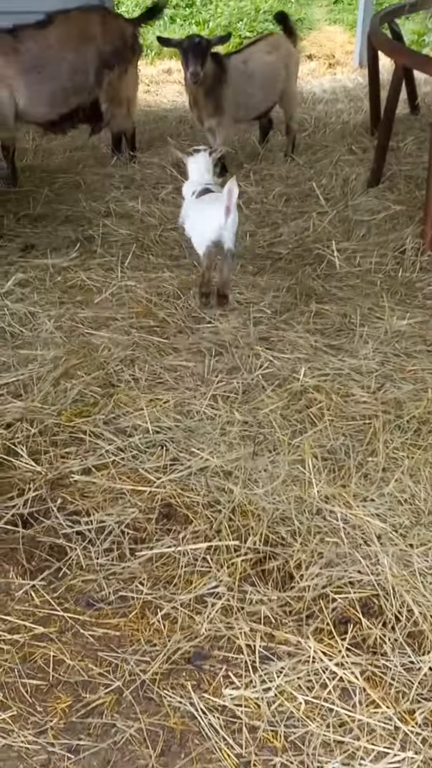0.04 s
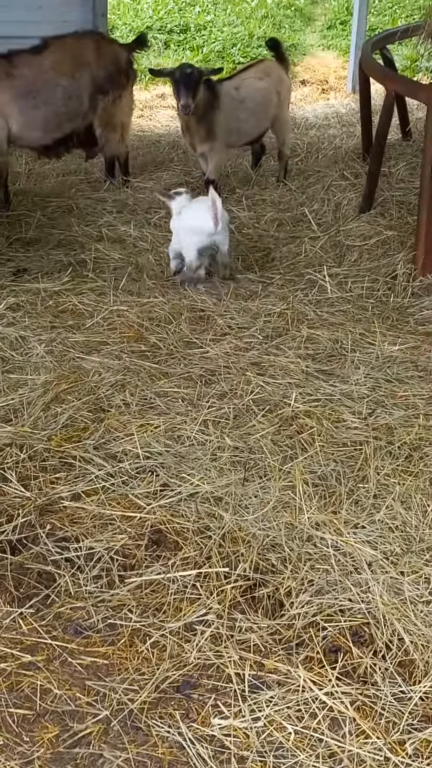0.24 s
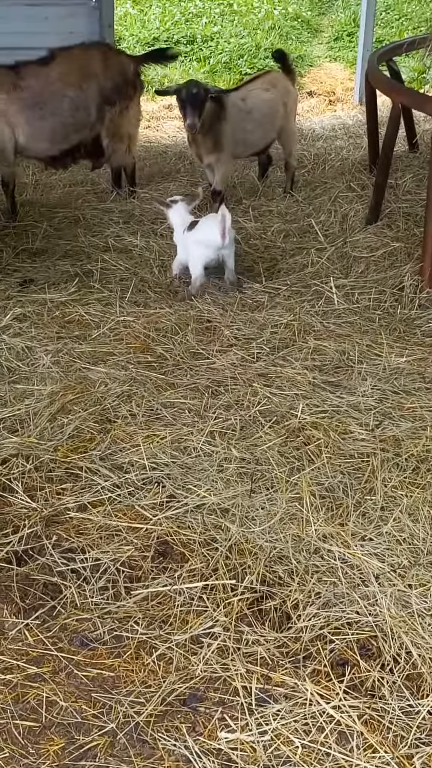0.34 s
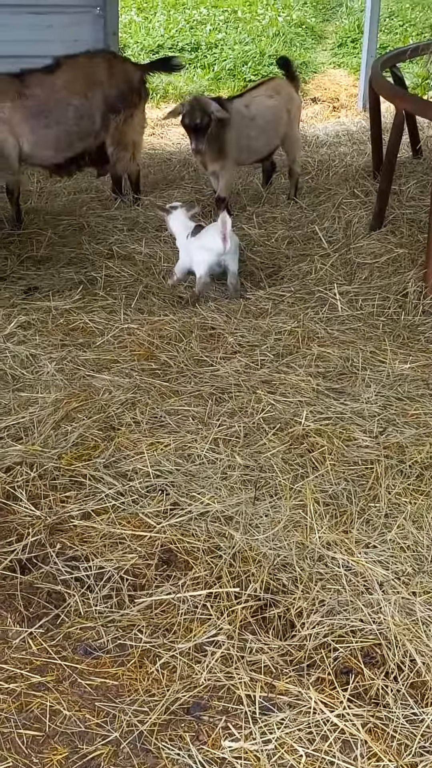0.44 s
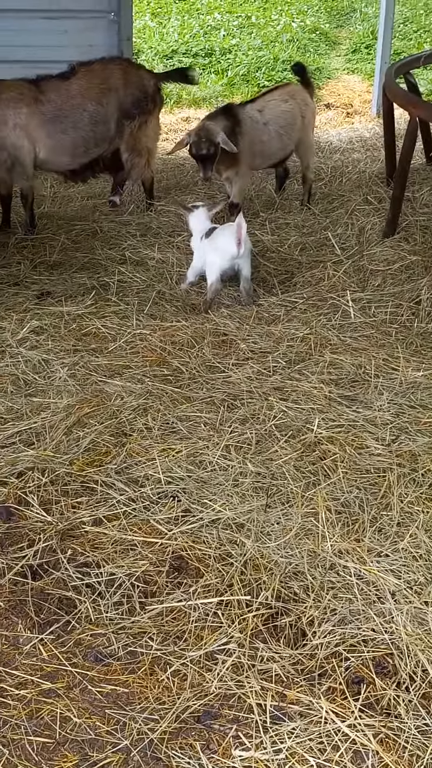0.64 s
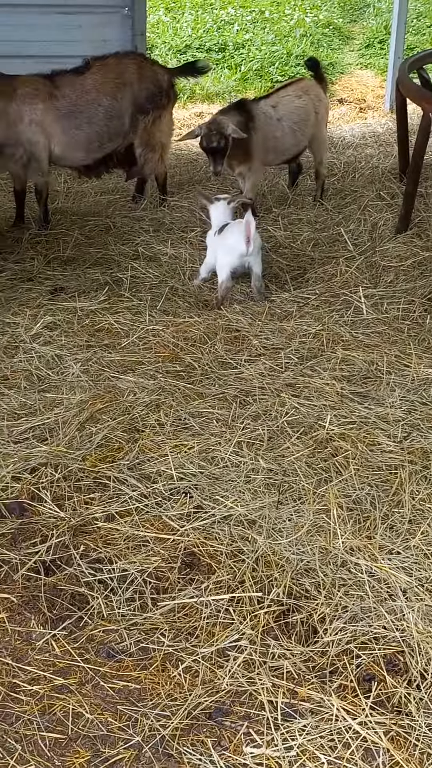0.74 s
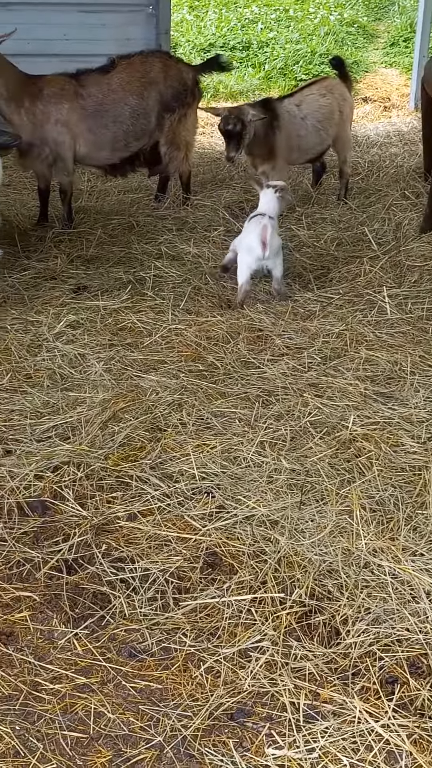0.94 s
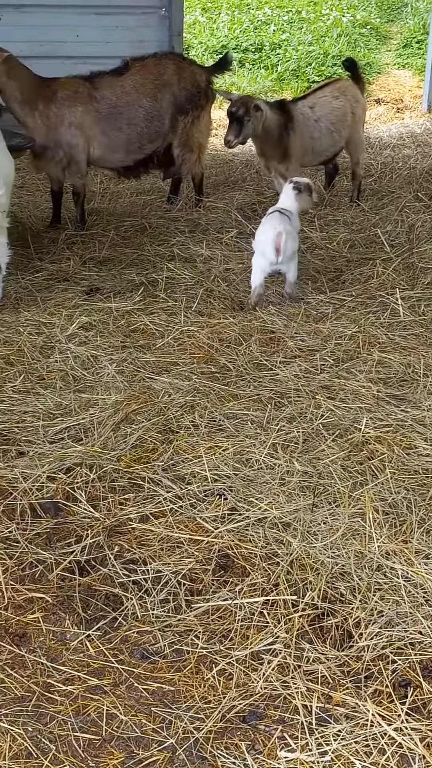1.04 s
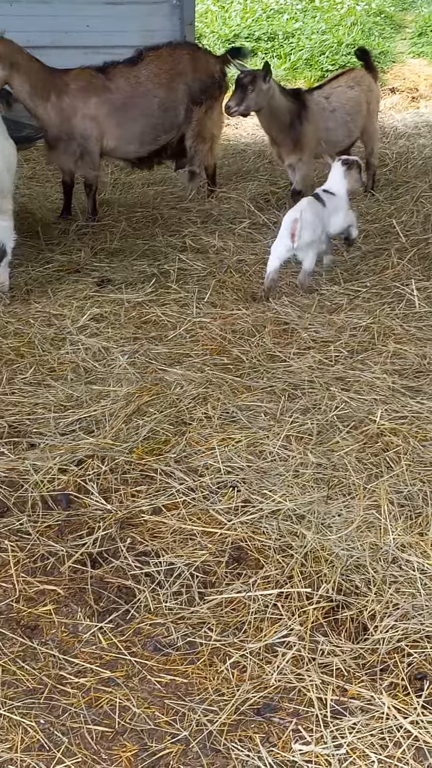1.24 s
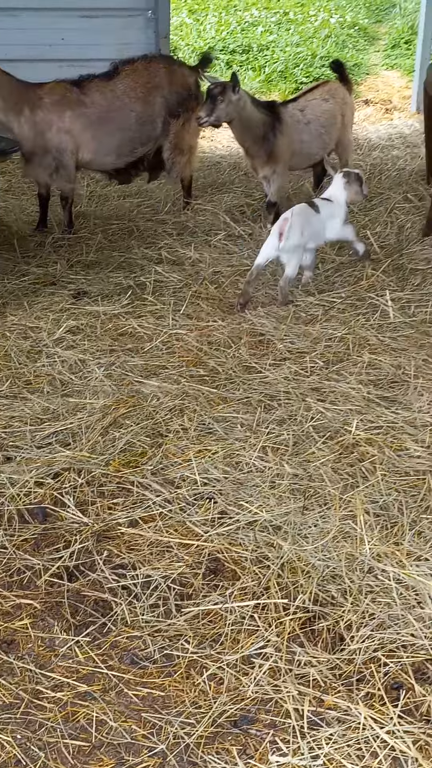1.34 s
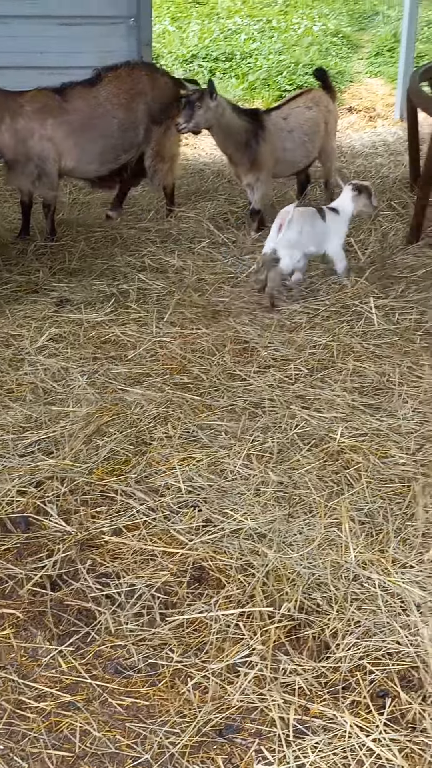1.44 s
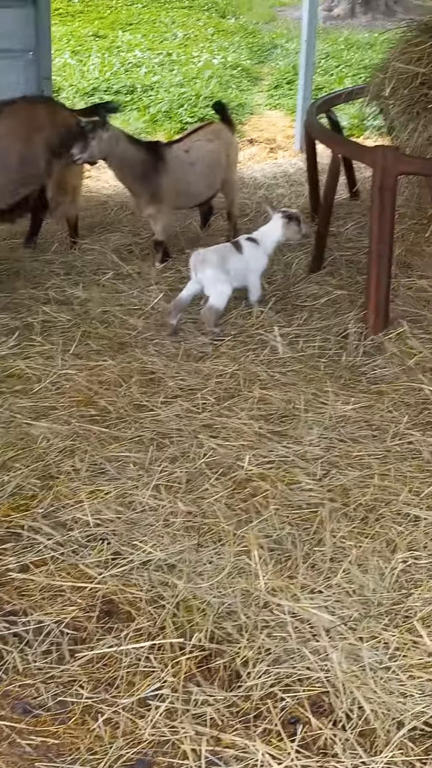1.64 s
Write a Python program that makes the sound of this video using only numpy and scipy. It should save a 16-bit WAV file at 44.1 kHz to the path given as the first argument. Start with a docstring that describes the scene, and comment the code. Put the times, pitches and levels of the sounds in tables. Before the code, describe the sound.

In an open-sided straw pen, goat hooves patter with dull wooden knocks while dry stalks crackle; the steps peak midway, lighten into a dragging scuff and stop, over faint air and low wind rumble.

```python
"""Goats shuffle about a straw-covered pen under an open shed roof.
Throughout lie a faint outdoor hiss, band-filtered noise, and a lumpy low noise rumble, probably wind.
After a straw flick come two quick clusters of hoof thumps: decaying modes of something hollow and wooden.
A longer run follows under the loudest straw rustle, made of flickering noise and ringing crackles.
Lighter thumps and a strong scuff, noise through the same modes, come late; then the hooves stop."""
import sys
import numpy as np
from scipy import signal
from scipy.fft import rfft, irfft, next_fast_len
from scipy.io import wavfile

SR = 44100
rng = np.random.default_rng(int(sys.argv[2]) if len(sys.argv) > 2 else 0)


def pcm_store(signal):
    """Save signal as 16-bit PCM."""
    levels = np.round(np.clip(np.atleast_2d(signal), -1, 1) * 32767)
    wavfile.write(sys.argv[1], SR, levels.astype(np.int16).T)


N = 72765

# Mode levels are relative: each layer adds its own gain.
# Low modes of the hollow wooden body: frequency_hz [Hz], level_db [dB], t60_s [s]
BODY_MODES = [(91.4, -3.5, 0.52), (146, -12.5, 0.37), (178, 1, 0.23), (215, -2.5, 0.23), (231, -4.5, 0.22),
              (262.7, 2, 0.12), (293.6, 2.5, 0.16), (320, -1, 0.12), (364, -1, 0.2)]
# Higher hollow overtones of the body: frequency_hz [Hz], level_db [dB], t60_s [s]
OVERTONE_MODES = [(460, -1.5, 0.056), (561, -3, 0.098), (622, -4, 0.057), (718, -13, 0.096)]
# Brighter knock of the hoof edge: frequency_hz [Hz], level_db [dB], t60_s [s]
KNOCK_MODES = [(865.6, -7, 0.14), (1043, -0.5, 0.015), (1141, -2, 0.029), (1373, -10, 0.028),
               (1467, -3.5, 0.016), (1780, -19, 0.013), (2326, 1.5, 0.04), (2950, -25, 0.02)]
# Spectral density of straw noise: frequency_hz [Hz], relative density_db [dB per Hz]
STRAW_SPECTRUM = [(240, -24), (400, -4.5), (754, -6), (846, 1.5), (985, -5), (1300, -4), (1520, -7.5),
                  (2680, -8.5), (3640, -15.5), (5530, -17), (7040, -22.5), (8300, -43), (10800, -73),
                  (18300, -120)]

RIGHT_LAG_S = 0.0001  # later arrival on the right


def from_db(db):
    """A level difference in decibels is a logarithmic amplitude ratio."""
    return 10 ** (np.asarray(db) / 20)


def rms_one(x):
    """Dividing by the root mean square sets the mean power to 1."""
    return x / np.sqrt(np.mean(x ** 2) + 1e-20)


def level_in_time(points):
    """An envelope is interpolated linearly in decibels between its time points."""
    time_s, level_db = np.transpose(points)
    return np.interp(np.arange(N) / SR, time_s, level_db)


def at_hz(points, hz):
    """A spectrum is interpolated over the logarithm of frequency."""
    frequency_hz, value = np.transpose(points)
    return np.interp(np.log(hz), np.log(frequency_hz), value)


def band(x, low_hz, high_hz):
    """A band-pass filter keeps the energy between two corner frequencies."""
    corners_hz = [low_hz, min(high_hz, 0.45 * SR)]
    return signal.sosfilt(signal.butter(2, corners_hz, "band", fs=SR, output="sos"), x)


def drift(corner_hz):
    """Noise through two equal low-pass poles is a slow random fluctuation; rms 1."""
    step = 40  # samples between the computed points
    pole = np.exp(-2 * np.pi * step * corner_hz / SR)
    noise = rng.standard_normal(N // step + 2002)
    slow = signal.lfilter([1], [1, -2 * pole, pole * pole], noise)[2000:]  # settled part
    return np.interp(np.arange(N) / step, np.arange(len(slow)), rms_one(slow))


def ring(x, hz, t60_s):
    """A two-pole resonator answers a unit impulse with a decaying sine of height 1."""
    radius = from_db(-60 / (t60_s * SR))
    angle = 2 * np.pi * hz / SR
    return signal.lfilter([0, np.sin(angle)], [1, -2 * radius * np.cos(angle), radius ** 2], x + 1e-18)


def stereo(mid, side, correlation):
    """The power shares of sum and difference signals set the correlation between the sides."""
    correlation = np.clip(correlation, -1, 1)
    return np.sqrt(1 + correlation) * mid + np.sqrt(1 - correlation) * side * [[1], [-1]]


def coloured(spectrum, patchy_db, snap_share):
    """Weighted third-octave bands of noise and tiny snaps shape a spectrum, with slow modulation; rms 1."""
    # Left-right correlation, clipped to -1..1: frequency_hz [Hz], correlation [no unit]
    side_likeness = [(60, 0.42), (150, -1.5), (380, 0.43), (950, -0.059), (2380, 0.15), (5980, -0.24),
                     (15000, 0.092)]
    snaps_per_s = 3000
    edges_hz = 90 * 2 ** np.arange(0, 7.7, 1 / 3)
    common = drift(14)

    snap_size = from_db(4.7 * np.minimum(rng.exponential(1, (2, N)), 3))
    snaps = (rng.random((2, N)) < snaps_per_s / SR) * snap_size
    share = np.clip(snap_share, 0, 1)
    power = 1 - share + share * rms_one(snaps)[:, None] ** 2
    grains = rng.standard_normal((2, 2, N)) * np.sqrt(power)

    out = 0
    for k, (low_hz, high_hz) in enumerate(zip(edges_hz, edges_hz[1:])):
        hz = np.sqrt(low_hz * high_hz)
        own = drift(21)
        if spectrum[0][0] <= hz <= spectrum[-1][0] * 1.1:
            gain = from_db(at_hz(spectrum, hz) + patchy_db * (1.14 * common + own))
            mid, side = band(grains[k % 2], low_hz, high_hz)  # neighbours use separate noise
            out = out + gain * stereo(mid, side, at_hz(side_likeness, hz))
    return rms_one(out)


def outdoor_air():
    """Broadband noise with a shaped spectrum gives a faint, unsteady hiss."""
    # Spectral density of the hiss: frequency_hz [Hz], relative density_db [dB per Hz]
    air_spectrum = [(59, -30), (100, 5), (583, 4.5), (1170, -13), (1830, -8), (3250, -14.5), (6560, -12.5),
                    (8110, -61), (14700, -27), (16000, -33)]
    return from_db(-46) * coloured(air_spectrum, patchy_db=-3.0, snap_share=0)


def rumble():
    """Narrow-band low noise, weakly correlated between sides, swells in lumps."""
    # Rumble envelope: time_s [s], level_db [dB]
    envelope = [(0.0, -30.5), (0.064, -35.5), (0.086, -30.5), (0.188, -41.5), (0.238, -24), (0.27, -19),
                (0.306, -23.5), (0.372, -31), (0.404, -29), (0.482, -44), (0.518, -33.5), (0.55, -55),
                (0.568, -37), (0.666, -41), (0.694, -32), (0.712, -26), (0.798, -42), (1.02, -52),
                (1.042, -44), (1.08, -43), (1.158, -55), (1.24, -35), (1.272, -49), (1.304, -30),
                (1.354, -43), (1.57, -86), (1.626, -65), (1.65, -63)]
    mid, side = band(rng.standard_normal((2, N)), 58.3, 102)
    return from_db(level_in_time(envelope)) * rms_one(stereo(mid, side, 0.31))


def crackle():
    """Breaking stalks are random impulses exciting short resonances, each with its own pitch and place."""
    crackles_per_s, ring_cycles = 350, 26  # mean rate; cycles in one t60
    born = rng.random(N) < crackles_per_s * from_db(4 * drift(15)) / SR
    strength = from_db(3.1 * np.minimum(rng.exponential(1, N), 3))
    place = rng.choice([-1, 1], (2, N)) * rng.uniform(0.36, 1, (2, N))
    clicks = born * strength * place

    pitches_hz = np.geomspace(750, 6000, 16)
    pitch_index = rng.integers(0, 16, N)
    out = 0
    for k, hz in enumerate(pitches_hz):
        gain = from_db(at_hz(STRAW_SPECTRUM, hz) + 10 * np.log10(hz))  # wider bands at higher pitch
        out = out + gain * ring(clicks * (pitch_index == k), hz, ring_cycles / hz)
    return rms_one(out)


def straw():
    """Friction noise in a main and a treble spectrum joins random crackles and brief band-noise flicks."""
    # Rustle envelope, before the gains of its layers: time_s [s], level_db [dB]
    rustle_levels = [(0.0, -51), (0.1, -63), (0.118, -48), (0.146, -54.5), (0.178, -48), (0.224, -51),
                     (0.234, -42), (0.238, -43.5), (0.28, -47), (0.362, -50), (0.39, -34.5), (0.418, -34),
                     (0.444, -40.5), (0.546, -35.5), (0.596, -39), (0.628, -33), (0.67, -28),
                     (0.684, -23.5), (0.836, -33), (0.9, -36.5), (0.918, -41), (0.95, -35), (0.988, -42),
                     (1.0, -35), (1.024, -43), (1.038, -37.5), (1.06, -42.5), (1.112, -39.5), (1.176, -49),
                     (1.216, -43.5), (1.262, -56), (1.414, -44), (1.446, -51), (1.492, -45), (1.63, -58.5),
                     (1.65, -52.5)]
    # Treble envelope, before the treble gain: time_s [s], level_db [dB]
    treble_levels = [(0.0, -54), (0.142, -60.5), (0.202, -52.5), (0.224, -56), (0.238, -43.5), (0.266, -59),
                     (0.398, -47.5), (0.444, -55), (0.582, -55), (0.642, -44.5), (0.67, -49.5),
                     (0.706, -37.5), (0.812, -59.5), (0.876, -54.5), (0.988, -59.5), (1.144, -54),
                     (1.176, -61.5), (1.25, -57.5), (1.322, -61.5), (1.538, -58), (1.59, -62.5),
                     (1.65, -57)]
    # Spectral density of the treble: frequency_hz [Hz], relative density_db [dB per Hz]
    treble_spectrum = [(5000, -5), (8500, -7), (11100, -5), (13300, -0.5), (14700, 10), (15700, -8)]
    # A straw or twig flicks: start_s [s], length_s [s], low_hz [Hz], high_hz [Hz], level_db [dB]
    flicks = [(0.112, 0.024, 1430, 2450, -45.5), (0.179, 0.0023, 800, 2580, -33),
              (0.627, 0.0173, 2600, 4300, -34), (0.658, 0.0065, 2650, 2950, -34),
              (0.97, .013, 2760, 3100, -52), (0.973, 0.011, 6140, 6800, -41),
              (1.306, 0.016, 1150, 1400, -47)]
    rustle_gain_db, treble_gain_db, crackle_gain_db = 4, 6, -2

    rustle_db = level_in_time(rustle_levels)
    treble_db = level_in_time(treble_levels)
    out = from_db(rustle_db + rustle_gain_db) * coloured(STRAW_SPECTRUM, patchy_db=1.4, snap_share=0.48)
    out += from_db(treble_db + treble_gain_db) * coloured(treble_spectrum, patchy_db=0.0, snap_share=0.31)
    out += from_db(rustle_db + crackle_gain_db) * crackle()

    t = np.arange(N) / SR
    for start_s, length_s, low_hz, high_hz, level_db in flicks:
        ramp_s = 0.0019
        shape = np.clip(np.minimum(t - start_s, start_s + length_s - t) / ramp_s, 0, 1)
        noise = rms_one(band(rng.standard_normal(N), low_hz, high_hz))
        out += from_db(level_db) * shape * noise
    return out


def scuffing():
    """Dragged feet are a continuous random force that drives the resonant modes of the body."""
    # Scuff envelope, before the scuff gain: time_s [s], level_db [dB]
    scuff_levels = [(0.0, -36.5), (0.252, -56), (0.372, -30), (0.68, -38), (1.074, -38.5), (1.244, -26.5),
                    (1.406, -38.5), (1.544, -54.5), (1.65, -51.5)]
    scuff_gain_db = -3
    force = rng.standard_normal((2, N)) * from_db(0.83 * drift(58))
    modes = BODY_MODES + OVERTONE_MODES + KNOCK_MODES[:1]
    mid, side = (sum(from_db(mode_db) * rms_one(ring(drive, hz, t60_s)) for hz, mode_db, t60_s in modes)
                 for drive in force)
    return from_db(level_in_time(scuff_levels) + scuff_gain_db) * rms_one(stereo(mid, side, 0.89))


def shed(x):
    """Reverberation is recirculating delay, six loops a side, with a low-pass loss on every round."""
    t60_s, wall_cut_hz = 0.33, 2450
    size = next_fast_len(N + SR)
    angle = 2 * np.pi * np.arange(size // 2 + 1) / size
    dull = 1 / (1 + 1j * angle * SR / (2 * np.pi * wall_cut_hz))
    out = []
    for dry_side, delays in zip(x, rng.uniform(0.012, 0.04, (2, 6)) * SR):
        response = 0
        for k, delay in enumerate(delays):
            loop = from_db(-60 * delay / SR / t60_s) * dull * np.exp(-1j * angle * delay)
            response = response + (-1) ** k * loop / (1 - loop)  # sum of all rounds
        out.append(irfft(rfft(dry_side, size) * response, size)[:N])
    return np.array(out)


def strike(modes, db, centre_hz, focus_db_per_oct2, damping, contact_s, lags_s):
    """An impact excites decaying modes, strongest near a centre, with an onset set by contact time."""
    hz, mode_db, t60_s = np.transpose(modes)[:, :, None]
    focus_db = np.maximum(focus_db_per_oct2 * np.log2(hz / centre_hz) ** 2, -20)
    chance_db = 1.2 * rng.standard_normal(hz.shape)
    level_db = mode_db + db + focus_db + chance_db

    t = np.maximum(np.arange(SR // 5) / SR - np.reshape(lags_s, (2, -1, 1)), 0)
    onset = 1 - np.exp(-t / contact_s)
    decay = from_db(level_db - 60 * t / (t60_s * np.clip(damping, 0.05, 1.5)))
    tones = onset * decay * np.sin(2 * np.pi * hz * t)
    fade_out = np.minimum(1, np.linspace(8, 0, SR // 5))
    return -np.sum(tones, axis=1) * fade_out


def pan(sound, left_over_right_db):
    """A level difference between the sides shifts the apparent direction."""
    return sound * from_db([[left_over_right_db / 2], [-left_over_right_db / 2]])


def hoof_thumps():
    """Each hoof contact is an impact that rings the low modes and hollow overtones of the body."""
    # Hoof contacts: start_s [s], level_db [dB before layer gains], centre_hz [Hz],
    # overtone_db [dB over the thump before layer gains], ring_share [of free t60], left_over_right_db [dB]
    contacts = [(0.2, -20.5, 201, -14, 0.52, -15.5), (0.235, -18.5, 306, 4, 0.27, -9),
                (0.2402, -5.5, 268, -27, 0.31, -3), (0.2504, 0, 222, -5.5, 0.37, -1.5),
                (0.264, -18, 148, 0, 0.66, 8), (0.279, -13.5, 238, 0.5, 0.58, -5),
                (0.295, -13, 227, -4, 0.65, 0), (0.384, -15, 305, -12, 0.53, -6),
                (0.392, -2, 252, -13, 0.39, 1.5), (0.403, 0, 332, -9, 0.47, -3),
                (0.4157, -5, 290, -6.5, 0.37, 1.5), (0.4205, -4, 267, -0.5, 0.4, -1),
                (0.439, -12.5, 286, -9, 0.3, -9), (0.4446, -10.5, 313, -7, 0.47, 4),
                (0.457, -9, 193, -13, 0.42, -7), (0.479, -14.5, 200, -8, 0.36, 2),
                (0.515, -26, 320, -16, 0.6, -8), (0.596, -29, 287, -25, 0.68, -4),
                (0.641, -15.5, 252, -28, 0.89, -1), (0.654, -11.5, 231, -17, 1, -3),
                (0.684, 4, 231, -23, 0.49, -2.5), (0.695, -2.5, 215, -33, 0.43, 1),
                (0.6989, 3.5, 251, -13, 0.12, -1.5), (0.707, -8, 254, -12, 0.47, 2),
                (0.724, -31, 254, -30, 0.34, 7), (0.737, -6.5, 172, -33, 0.68, -2.5),
                (0.763, -10.5, 180, -15, 1, -1), (0.784, -10, 192, -22, 0.65, 0),
                (0.8, -16, 178, -16, 1, 0), (0.816, -10, 238, -30, 0.5, -1),
                (0.838, -14, 232, -19, 0.47, -1.5), (0.857, -18, 239, -10.5, 0.8, -6),
                (0.938, -28, 268, -31, 1, -3), (0.973, -32, 303, -10, 1, 5),
                (1.036, -12.5, 277, -24, 0.26, -2.5), (1.0403, -11.5, 306, -20, 0.4, -3),
                (1.047, -9.5, 260, -16, 0.46, 1), (1.061, -6, 185, -12, 0.58, -1.5),
                (1.077, -8, 184, -14, 0.34, 0), (1.101, -16, 230, -25, 0.31, 0),
                (1.118, -14, 225, -25, 0.81, 2), (1.215, -12.5, 337, -15, 0.49, -4),
                (1.222, -19.5, 320, 6, 0.46, 0.5), (1.236, -13.5, 228, -17, 0.66, -1),
                (1.262, -24.5, 217, 0.5, 0.39, -2), (1.286, -11, 154, -10.5, 0.24, 1),
                (1.34, -18, 215, -24, 1, 3), (1.386, -28, 337, -22, 1, 3),
                (1.448, -36, 320, -26, 0.45, -10)]
    thump_gain_db, overtone_gain_db, contact_s = -5, 3, 0.0027
    out = np.zeros((2, N + SR))
    for start_s, level_db, centre_hz, overtone_db, ring_share, left_over_right_db in contacts:
        thump = strike(BODY_MODES, level_db + thump_gain_db, centre_hz, -95, ring_share,
                       contact_s, [0, RIGHT_LAG_S])
        pitch_factor = 1 + 0.04 * rng.standard_normal()
        overtones = strike(OVERTONE_MODES * np.array([pitch_factor, 1, 1]),
                           level_db + overtone_db + overtone_gain_db, 555, -31, ring_share,
                           contact_s, [0, 2 * RIGHT_LAG_S])
        sound = pan(thump + overtones, left_over_right_db)
        out[:, int(start_s * SR):][:, :sound.shape[1]] += sound
    return out[:, :N]


def hoof_knocks():
    """Hard hoof edges, with brief contact, excite bright modes and crunch straw as decaying noise."""
    # Hard edges that knock: start_s [s], level_db [dB before layer gains], centre_hz [Hz]
    edges = [(0.235, -2.5, 1420), (0.239, -8, 1163), (0.25, -16, 1780), (0.388, -13, 1270),
             (0.394, -15, 1400), (0.682, -8, 1270), (0.682, -17.5, 2030), (0.702, -11.5, 1210),
             (0.713, -11.5, 1070), (0.724, -12.5, 1280), (1.035, -13.5, 1070), (1.05, -20, 830),
             (1.217, -16, 900), (1.245, -22.5, 860)]
    knock_gain_db, crunch_gain_db, crunch_t60_s = -4.5, -17, 0.068
    scatter_s = 0.000068  # largest random arrival lag of a mode
    lags_s = rng.uniform(0, scatter_s, (2, len(KNOCK_MODES))) + [[0], [RIGHT_LAG_S]]
    t = np.arange(SR // 5) / SR
    out, crunch = np.zeros((2, N + SR)), np.zeros(N + SR)
    for start_s, level_db, centre_hz in edges:
        first = int(start_s * SR)
        knock = strike(KNOCK_MODES, level_db + knock_gain_db, centre_hz, -64, 1.0, 0.0003, lags_s)
        out[:, first:][:, :len(t)] += pan(knock, -1.5)
        crunch[first:][:len(t)] += from_db(level_db + crunch_gain_db - 60 * t / crunch_t60_s)
    return out[:, :N] + crunch[:N] * coloured(STRAW_SPECTRUM, patchy_db=-4.5, snap_share=0.067)


def scene():
    """Sound pressures superpose; only the hooves feed the shed's reverberation."""
    background = outdoor_air() + rumble()
    ground = straw() + scuffing()
    hooves = hoof_thumps() + hoof_knocks()
    return background + ground + hooves + from_db(-16.5) * shed(hooves)


def record(dry):
    """Filters limit the band at both ends, and soft saturation rounds the highest peaks between them."""
    bass_cut_hz, top_cut_hz = 70.6, 15850
    thin = signal.sosfilt(signal.butter(2, bass_cut_hz, "high", fs=SR, output="sos"), dry)
    rounded = thin / (1 + np.abs(thin) ** 6) ** (1 / 6) * 0.98
    return signal.sosfilt(signal.ellip(14, 0.5, 80, top_cut_hz, fs=SR, output="sos"), rounded)


dry = scene()
out = record(dry)
pcm_store(out)
```